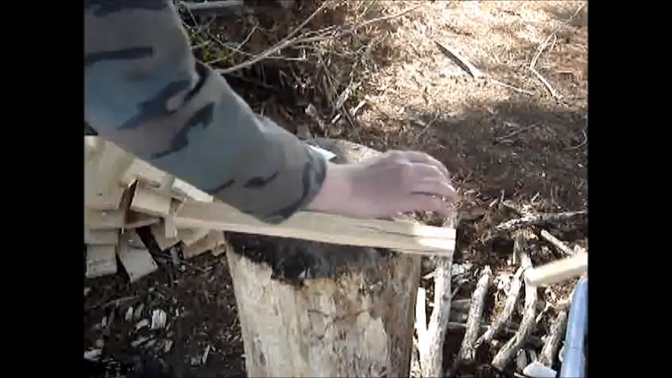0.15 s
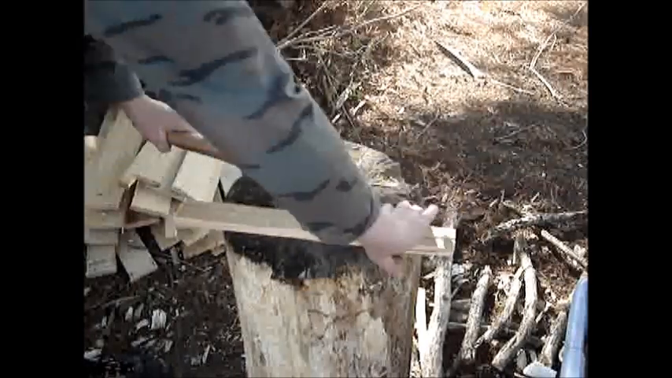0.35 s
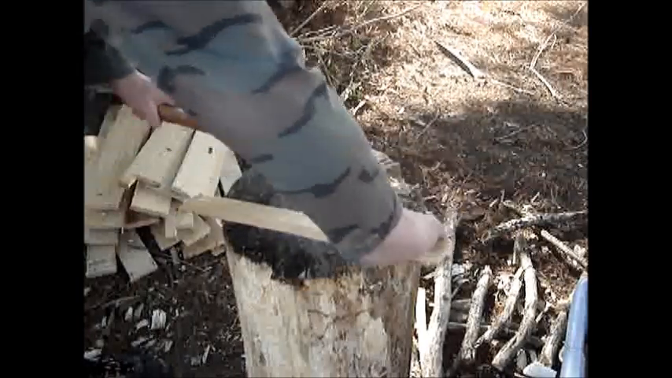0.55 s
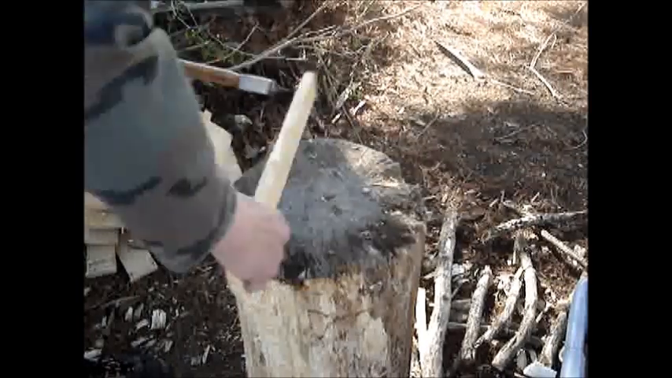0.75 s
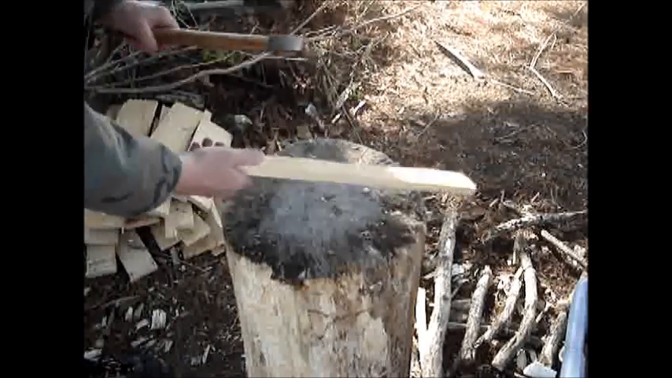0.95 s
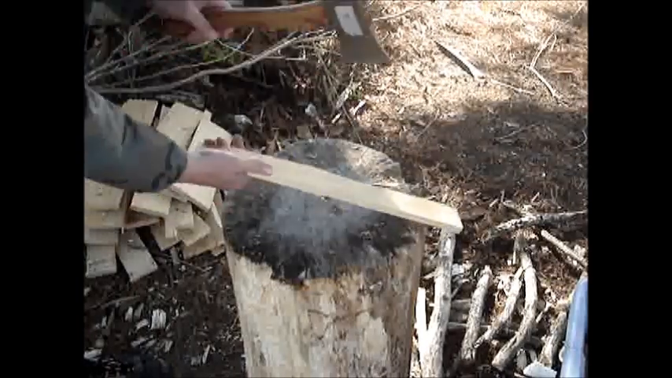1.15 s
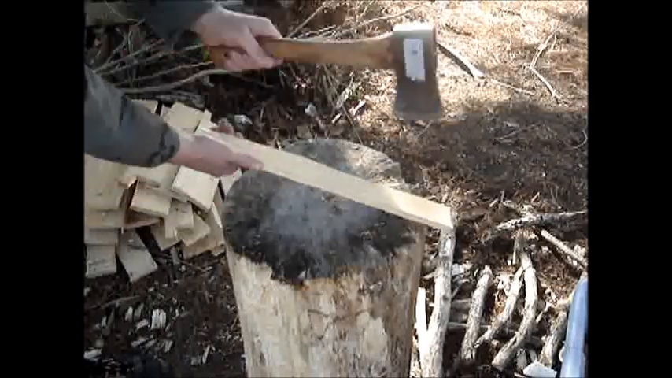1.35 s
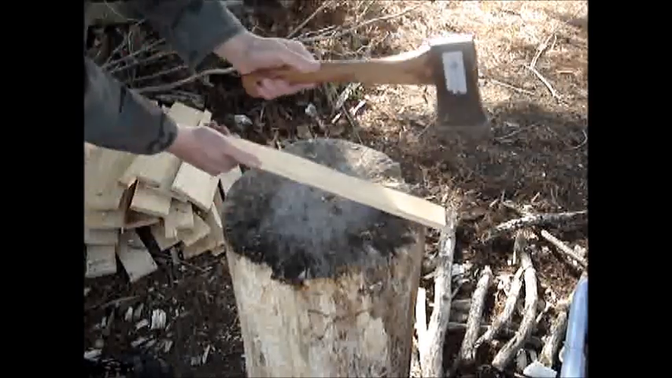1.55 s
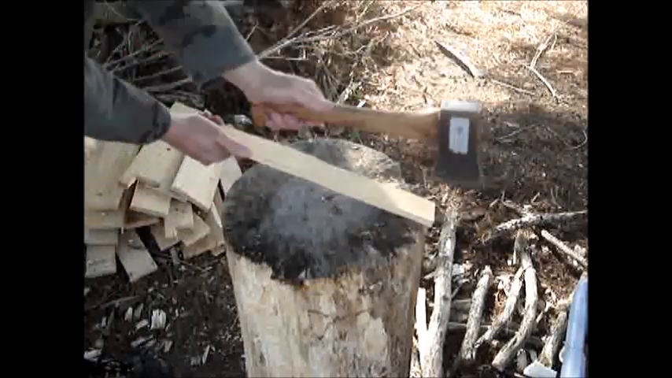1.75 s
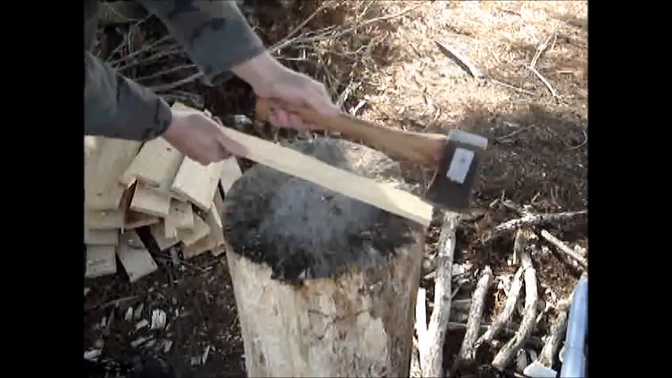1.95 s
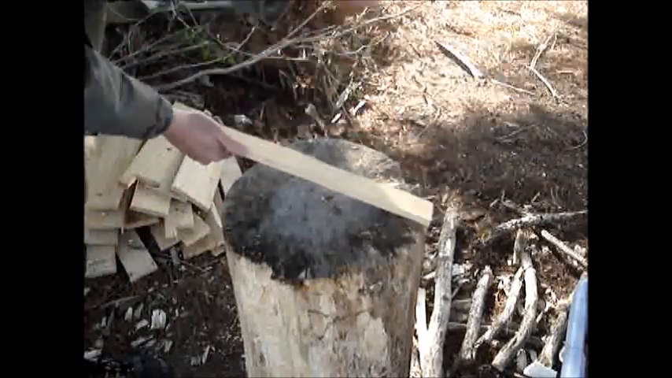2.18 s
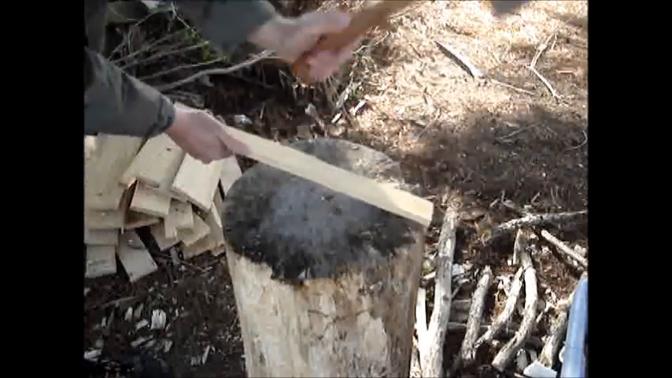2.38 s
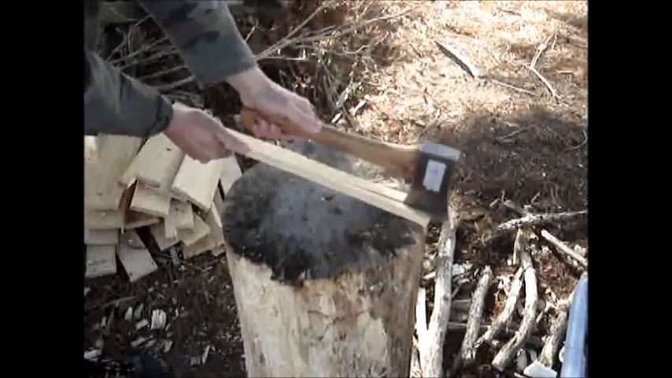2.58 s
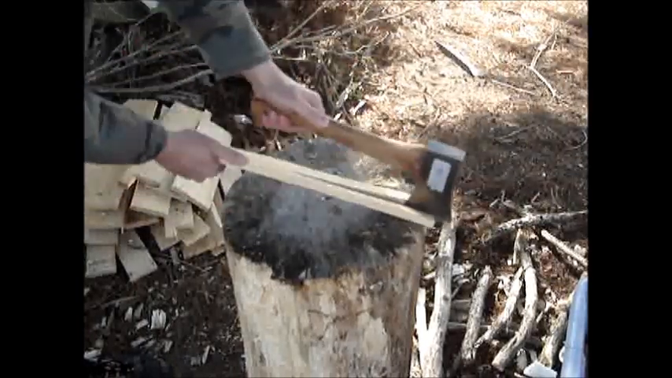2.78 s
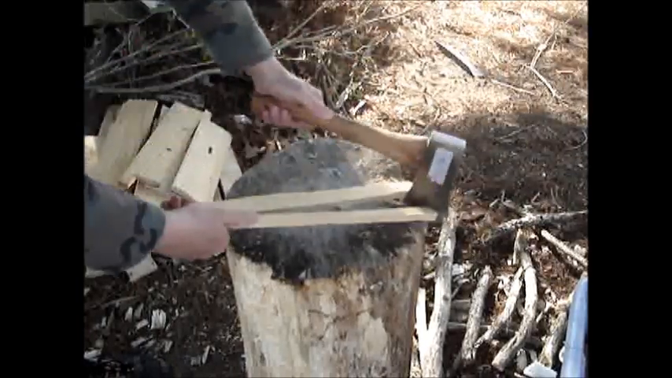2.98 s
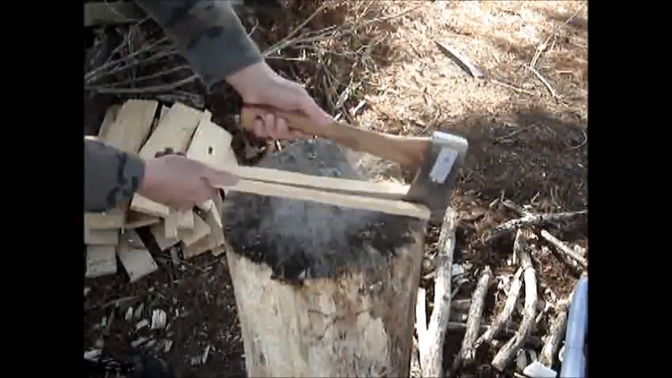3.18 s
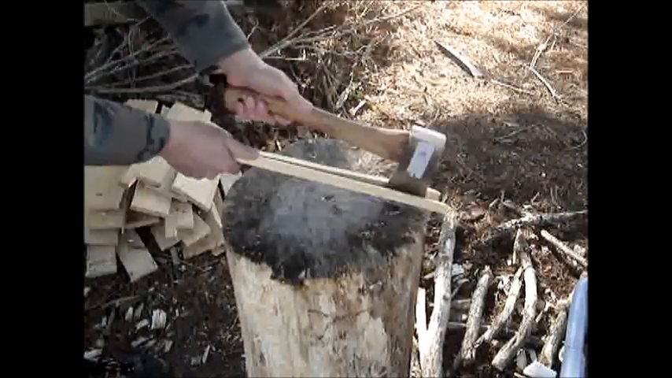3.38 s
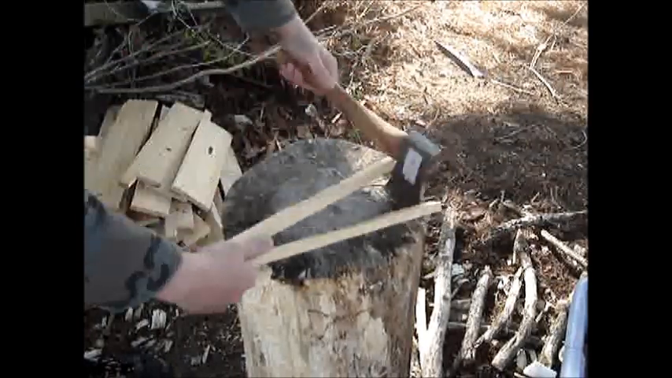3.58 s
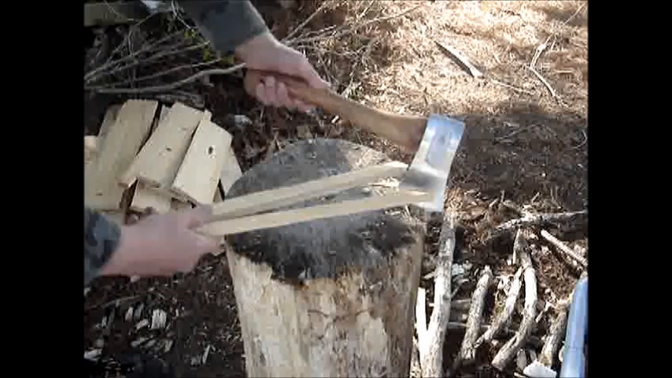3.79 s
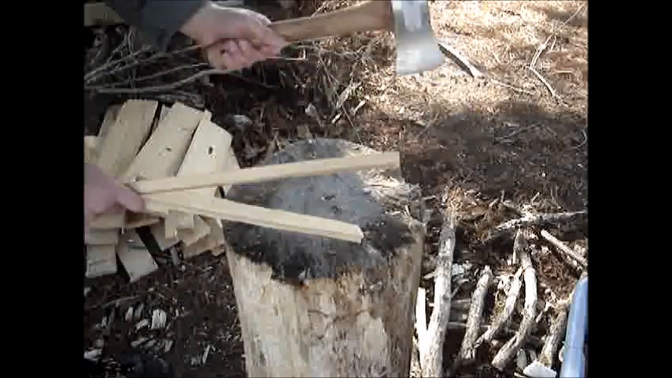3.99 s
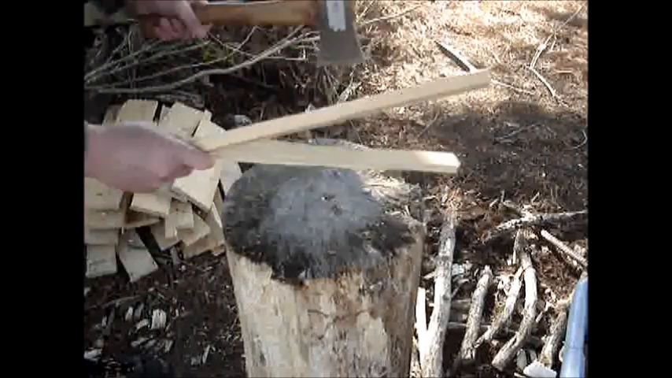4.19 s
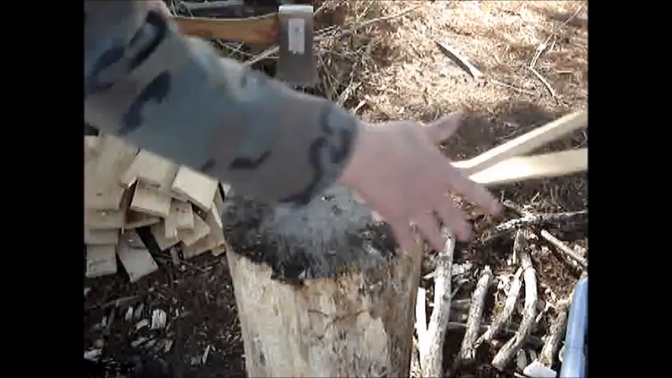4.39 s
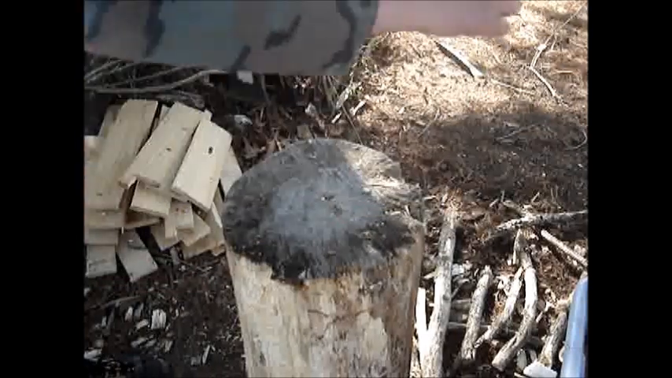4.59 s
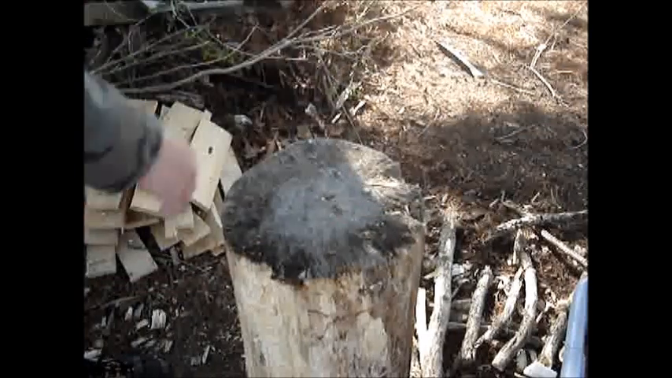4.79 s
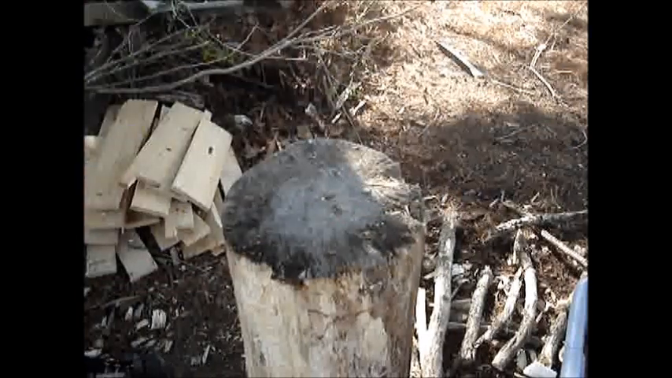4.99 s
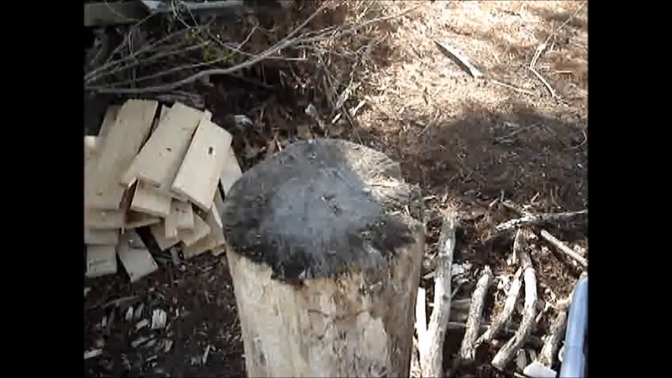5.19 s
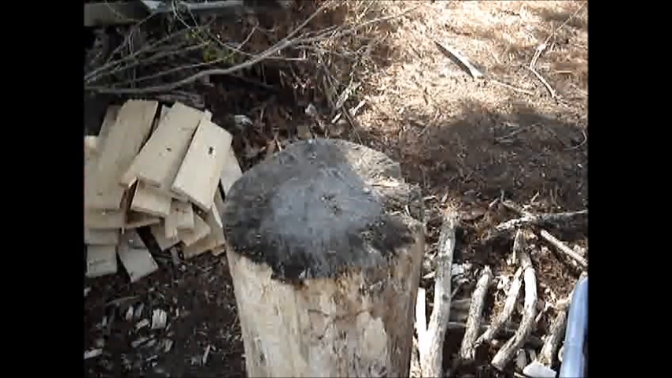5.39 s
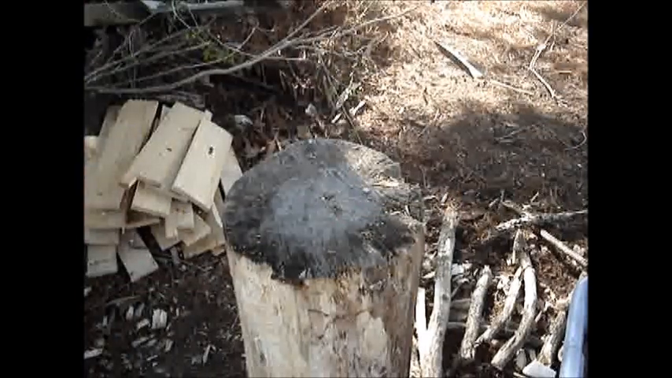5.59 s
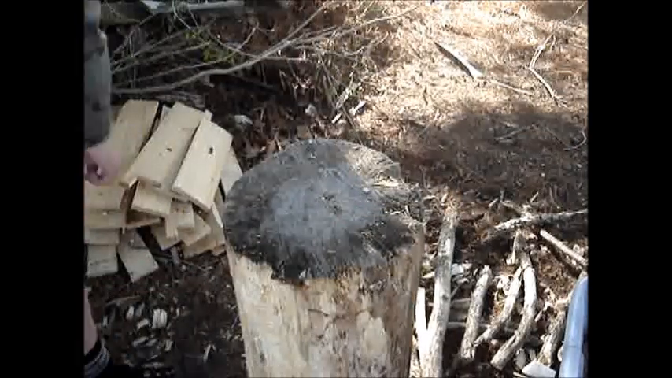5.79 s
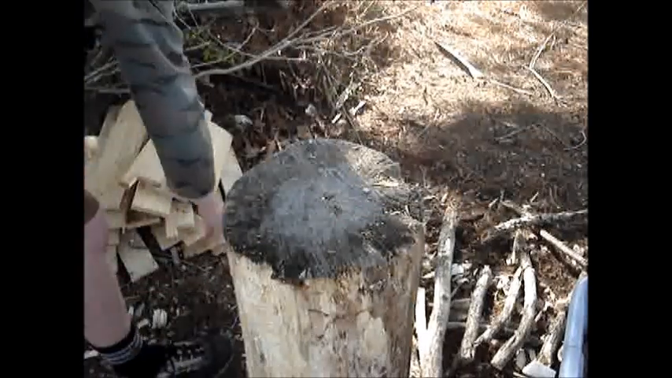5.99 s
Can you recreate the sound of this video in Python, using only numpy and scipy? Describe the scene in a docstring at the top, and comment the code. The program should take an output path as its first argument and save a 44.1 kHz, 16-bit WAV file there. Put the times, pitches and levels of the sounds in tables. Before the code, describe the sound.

Dry kindling is split at close range: a tossed stick rattles, short dull knocks, a crackling split, two halves clatter, with airy rush and faint birdsong.

```python
"""Kindling is split with a hatchet on a stump at the edge of a wood, over a distant rush of air.
Small birds whistle and far engines drone; a stick is tossed on the pile: noise bursts and ringing modes.
A dry board is laid down, struck twice (short dull knocks) and twisted until its fibres snap (bright cracks).
The halves are tossed too, and the birds whistle and chip (sliding tones).
All through, the air is filtered noise and the recorder adds a thin whine."""
import sys
import numpy as np
from scipy import signal
from scipy.fft import rfft, irfft
from scipy.io import wavfile

SR = 44100
rng = np.random.default_rng(int(sys.argv[2]) if len(sys.argv) > 2 else 0)


def store_pcm(level_fs):
    """Save levels as 16-bit WAV."""
    pcm = np.round(np.clip(level_fs, -1, 1) * 32767).astype(np.int16)
    wavfile.write(sys.argv[1], SR, np.atleast_2d(pcm).T)


N = 266800
TIME = np.arange(N) / SR

# bending modes of the two sticks: f/Hz, level/dB, t60/s (time to fall by 60 dB)
FIRST_STICK = [(668, -10, .15), (1034, -7, .22), (1231, -14, .12), (1975, 0, .105), (2478, -15, .08),
               (3035, -3, .1), (3261, -17, .11), (4378, -22, .13)]
SECOND_STICK = [(954, -13, .2), (1410, -15, .09), (1831, 0, .11), (2955, -11, .1)]
# colour of a touch on the woodpile: f/Hz, level/dB per Hz
PILE_COLOUR = [(71, -102), (120, -28.5), (612, 2), (838, -0.5), (989, 4.5), (1630, 0.5), (1930, 2.5),
               (2540, 2), (2790, -4), (3120, -1.5), (4510, -8.5), (5140, -16.5), (10000, -32.5),
               (13000, -68), (22000, -120)]
# colour of breaking fibres: f/Hz, level/dB per Hz
SNAP_COLOUR = [(59, -39), (100, -17), (312, -23), (624, -18), (1200, -15), (1540, -7), (1670, -11),
               (2060, -3), (3270, 0.5), (3670, 2), (7070, -7.5), (10000, -22.5), (13000, -73),
               (22000, -120)]


def chops():
    """Held down on the stump, the board gives a dead, short knock and settles; the blow that bites cracks it."""
    # board and blade knock on the stump: t/s, level/dB, t60/s, brightness/dB per octave, bass/dB,
    # board mode f/Hz, its ring/dB, settling/dB against the knock
    blows = [(1.0806, -14, .025, 5.5, 22.5, 3420, -3, -21), (1.8756, -10.3, .028, -1.5, 0, 827, -4.5, -21),
             (2.5311, -11.5, .03, 3.5, 13, 2170, 3, -22), (3.539, -31, .046, -1.5, -10, 760, -4, -14),
             (3.9754, -24.5, .05, -3, -6, 925, -9, -14)]
    settle_delay_s, settle_t60_s, settle_hz = .014, .11, 1950  # the board drops back after each knock
    bite_s, bite_db, bite_hz = 2.5482, -14, 1332
    give_s, give_db = .0047, -6  # the wood yields a little just before it cracks
    out = np.zeros(N)
    for s, db, t60, tilt_db, bass_db, mode_hz, ring_db, settle_db in blows:
        blow = knock(t60, .0069, tilt_db, bass_db, mode_hz, ring_db)
        add(out, s, from_db(db) * blow)
        settle = knock(settle_t60_s, crack_t60=.01, tilt_db=-4.5, bass_db=bass_db - 5,
                       mode_hz=settle_hz, ring_db=-10)
        add(out, s + settle_delay_s, from_db(db + settle_db) * settle)
    # a dying run of cracks as the wedge sinks in
    first_give = (bite_s - give_s, bite_db + give_db)
    cracks = dying_run(bite_s, bite_db, gap_s=.014, loss_db=9, count=4)
    for s, db in [first_give, *cracks]:
        mode_hz = bite_hz * rng.uniform(.92, 1.08)
        crack = knock(.11, crack_t60=.008, tilt_db=.5, bass_db=-13, mode_hz=mode_hz, ring_db=-3.5)
        add(out, s, from_db(db) * crack)
    return outdoors(out, wet_db=-18.5, t60=.18, damping=.25, delay_s=.008)


def knock(t60, crack_t60, tilt_db, bass_db, mode_hz, ring_db):
    """One blow on the held board: a noise burst plus the ring of its main mode."""
    # colour of a blow on the board: f/Hz, level/dB per Hz
    chop_colour = [(47, -34.5), (80, -18), (147, -26.5), (437, -14), (941, -4.5), (1200, -2.5),
                   (1560, -4.5), (1910, 0.5), (2240, -1.5), (2640, -2), (3100, -6), (4830, -15),
                   (8010, -26), (10000, -36.5), (13000, -81), (22000, -120)]
    blow = contact(chop_colour, t60, damping=.12, crack=.69, crack_t60=crack_t60, rise_s=.00026,
                   tilt_db=tilt_db, bass_db=bass_db)
    return blow + stick_ring([(mode_hz, ring_db, 1.03 * t60)])


def splitting():
    """The split runs along the grain in bright snaps, over a creeping crackle of tiny fibres."""
    # thick fibres snap as the blade is twisted and the halves are parted:
    # t/s, level/dB, brightness/dB per octave, bass/dB
    thick_fibres = [(2.812, -22.5, 2, 6), (2.83, -21, 2.5, 7), (2.842, -20.5, -.5, 8),
                    (2.862, -18.5, 4.5, 0), (2.868, -17.5, 3, -9), (2.875, -25, 1.5, 7),
                    (2.8861, -19.5, 4, 9), (2.9094, -20.5, 5, -4), (2.9199, -19, 5, -7),
                    (2.9403, -24.5, 4.5, -4), (2.9739, -19.5, 1.5, 14), (3.3235, -35.5, 3, 0),
                    (3.5261, -20, -1, 2), (3.5438, -29.5, 2, 4), (3.5768, -30.5, 13.5, 3),
                    (3.5992, -32, -2, -2), (3.894, -39, 3, -10), (3.9464, -39, 0, -4)]
    neighbour_s, neighbour_db = .004, -11.5  # a neighbouring fibre gives way just after each snap
    out = tearing()
    for s, db, tilt_db, bass_db in thick_fibres:
        add(out, s, from_db(db) * snap(tilt_db, bass_db))
        later_s = s + neighbour_s * rng.uniform(.42, 1.5)
        add(out, later_s, from_db(db + neighbour_db) * snap(tilt_db, bass_db=0))
    return outdoors(out, wet_db=-40, t60=.16, damping=.16, delay_s=.0065)


def snap(tilt_db, bass_db):
    """One thick fibre breaks; the whole board jerks in the hand as a low 55 Hz thump."""
    crack = contact(SNAP_COLOUR, .017, damping=.067, crack=1.04, crack_t60=.0067, rise_s=.0012,
                    tilt_db=tilt_db, bass_db=bass_db)
    return crack - stick_ring([(55, -30.5 + bass_db, .045)])


def tearing():
    """Many tiny fibres part at random while the split creeps on."""
    # the split creeps on between snaps: start t/s, length/s, level/dB
    creeps = [(2.794, 0.16, -38.5), (2.929, .13, -47.5), (3.295, 0.14, -52.5), (3.514, 0.13, -46.5),
              (3.621, 0.33, -55.5), (4.36, .04, -52)]
    out = np.zeros(N)
    for s, length, db in creeps:
        fibres = crackle(length, per_s=2000, spread_db=4.5, colour=SNAP_COLOUR, tilt_db=-7, bass_db=-17.5)
        add(out, s, from_db(db) * fibres)
    return out


def tossed_sticks():
    """Each stick lands on its tip, slaps down flat, rings, rattles and stirs the litter; rebounds follow."""
    # a tossed stick meets the pile tip first, then falls flat: t/s, tip level/dB, fall time/s,
    # slap level/dB, ring level/dB, rattle level/dB, brightness/dB per octave, its modes
    tosses = [(0.3872, -12.5, 0.025, -10.5, -3, -17, -.8, FIRST_STICK),
              (4.6719, -12, 0.028, -11.5, -11, -14.5, .5, FIRST_STICK),
              (4.7172, -15, .0055, -19.5, -3, -23.5, 1, SECOND_STICK)]
    # loose wood rebounds on the pile; the spot that is struck favours one mode:
    # t/s, level/dB, brightness/dB per octave, mode f/Hz, its ring/dB
    bounces = [(.512, -33, -12.5, 770, -12), (.559, -20.5, 1.5, 3090, -4), (0.604, -24.5, -2.5, 2500, -11),
               (.638, -27.5, -2.5, 1030, -4), (.844, -34, -5, 1040, -3), (4.8683, -23.5, -1.5, 1830, -16),
               (4.931, -26.5, -1, 955, -15), (4.944, -25.5, -3, 1420, -14), (4.971, -18, 1, 2345, -12),
               (5.1213, -27.5, -1, 4820, -13), (5.306, -37.5, -1.5, 1630, -9)]
    tip_ring_db = -6.5  # against the tip's blow
    skid_s, skid_db = .0105, -10.5  # the tip skids once; dB against the tip's blow
    rattle_delay_s = .009  # after the slap
    out = np.zeros(N)
    for s, tip_db, fall_s, slap_db, ring_db, rattle_db, tilt_db, modes in tosses:
        ring = stick_ring(modes)
        flat_s = s + fall_s
        tip = clack(.068, tilt_db) + from_db(tip_ring_db) * ring
        add(out, s, from_db(tip_db) * tip)
        add(out, s + skid_s, from_db(tip_db + skid_db) * clack(.055, tilt_db))
        # the flat slap is a little brighter than the tip
        slap = clack(.069, tilt_db + 1)
        add(out, flat_s, from_db(slap_db) * slap)
        add(out, flat_s, from_db(ring_db) * lifted(ring))
        add(out, flat_s + rattle_delay_s, rattle(ring, rattle_db, tilt_db))
        # chips and dry needles stir under it
        litter = crackle(.22, per_s=1500, spread_db=3, colour=PILE_COLOUR, tilt_db=-1.2, bass_db=9)
        add(out, flat_s, from_db(-50.5) * litter)
    for s, db, tilt_db, mode_hz, ring_db in bounces:
        add(out, s, from_db(db) * rebound(tilt_db, mode_hz, ring_db))
    return outdoors(out, wet_db=-24.5, t60=.67, damping=.25, delay_s=.012)


def clack(t60, tilt_db):
    """One touch of a stick on the pile: a short burst of noise in the pile's colour."""
    return contact(PILE_COLOUR, t60, damping=.44, crack=.98, crack_t60=.02, rise_s=.0006,
                   tilt_db=tilt_db, bass_db=2)


def lifted(ring):
    """The pile mutes a stick until it has sprung clear, so its ring swells in over some 7.5 ms."""
    return ring * (1 - np.exp(-(TIME[:len(ring)] / .0075) ** 2))


def rattle(ring, db, tilt_db, count=4, size=32768):
    """Ever weaker, duller and longer touches of a stick coming to rest."""
    out = np.zeros(size)
    touches = dying_run(0, db, gap_s=.012, loss_db=3, count=count)
    for k, (s, touch_db) in enumerate(touches):
        t60 = .06 + k * .022
        touch_tilt_db = tilt_db + 1.8 - k * 1.3
        touch = clack(t60, touch_tilt_db) + from_db(-20) * ring
        add(out, s, from_db(touch_db) * touch)
    return out


def rebound(tilt_db, mode_hz, ring_db):
    """A light, sharp touch with one clear mode over the faint ring of the whole first stick."""
    touch = contact(PILE_COLOUR, .078, damping=.41, crack=1.43, crack_t60=.015, rise_s=.0004,
                    tilt_db=tilt_db, bass_db=4)
    clear_mode = stick_ring([(mode_hz, ring_db, .1)])
    return touch + clear_mode + from_db(-16) * stick_ring(FIRST_STICK)


def birds(count=4):
    """Nearly pure sliding whistles and a series of buzzy high chips, smeared by the trees."""
    # whistled notes: start t/s, length/s, first f/Hz, last f/Hz, level/dB
    notes = [(-.01, 0.1305, 3520, 3360, -47.5), (.1, .18, 3400, 3364, -58.5),
             (5.298, 0.18, 2645, 2695, -48.5), (5.563, 0.217, 2623, 2715, -47),
             (5.827, .21, 2690, 2692, -41.5)]
    flutter_db, flutter_hz = 1.5, 8.3  # unsteady loudness of a whistle
    chip_start_s, chip_gap_s, chip_s = 5.211, .265, .068
    chip_hz, chip_climb_hz, chip_buzz_hz = 6640, 208, 150
    chip_db, chip_growth_db = -56.5, 2.5
    out = np.zeros(N)
    for s, length, first_hz, last_hz, db in notes:
        note = glide(length, first_hz, last_hz, waver_hz=16, waver_rate_hz=44)
        flutter = flutter_db * narrow_noise(flutter_hz, flutter_hz, len(note))
        add(out, s, from_db(db + flutter) * note)
    # a second bird chips in even time, each chip louder and sweeping higher than the last
    for k in range(count):
        chip = glide(chip_s, chip_hz, chip_hz + k * chip_climb_hz, chip_buzz_hz, waver_rate_hz=79)
        add(out, chip_start_s + k * chip_gap_s, from_db(chip_db + k * chip_growth_db) * chip)
    return outdoors(out, wet_db=-8, t60=.6, damping=.2, delay_s=.02)


def far_engines():
    """Faint low drones of engines come and go as slowly sliding tones."""
    # engines on a far road: start t/s, length/s, first f/Hz, last f/Hz, level/dB
    drones = [(-0.05, 2.6, 99, 85, -62), (1.7, 0.65, 110, 133, -55.5), (1.6, 0.95, 218, 235, -55.5)]
    out = np.zeros(N)
    for s, length, first_hz, last_hz, db in drones:
        drone = glide(length, first_hz, last_hz, waver_hz=1.45, waver_rate_hz=5.8)
        add(out, s, from_db(db) * drone)
    return out


def distant_air():
    """Noise in three bands: rumble and rush swell and ebb slowly under a steady hiss."""
    # distant air: t/s, rush level/dB, rumble level/dB
    swells = [(0, -46, -53), (.5, -44.5, -54.5), (.85, -47.5, -56), (1.35, -43.5, -54.5), (1.9, -44.5, -50),
              (2.42, -43.5, -50.5), (3.0, -52.5, -64.5), (4.13, -50, -60), (4.55, -47.5, -55),
              (5.05, -44, -57.5), (6.05, -45, -50.5)]
    # colour of the air: f/Hz, level/dB per Hz
    air_colour = [(15, -46), (25, -10.5), (37, -13.5), (107, -2.5), (227, -1.5), (394, -1.5), (470, -0.5),
                  (519, 0), (1050, 3), (2860, -15.5), (3400, -17.5), (4600, -20), (7220, -22.5),
                  (7980, -19.5), (10000, -30.5), (13000, -80), (22000, -120)]
    hz = bins(N)
    noise = rfft(rng.standard_normal(N)) * from_db(at_hz(air_colour, hz))
    s, rush_db, rumble_db = np.transpose(swells)
    levels = [np.interp(TIME, s, rumble_db), np.interp(TIME, s, rush_db), -56]
    edges_hz = [0, 350, 2500, SR / 2]
    out = np.zeros(N)
    for low, high, db in zip(edges_hz, edges_hz[1:], levels):
        band = irfft(noise * (hz > low) * (hz <= high), N)
        out += rms_one(band) * from_db(db)
    return out


def recorder_whine():
    """A thin electronic tone that restarts each frame and blinks off twice a frame."""
    whine_hz, frame_hz, whine_db = 7867, 29.97, -61  # level while the tone is on
    in_frame = TIME * frame_hz % 1
    lit = 2 * in_frame % 1 > .06
    tone = np.sqrt(2) * np.sin(2 * np.pi * whine_hz * in_frame / frame_hz)
    return from_db(whine_db) * lit * tone


def contact(colour, t60, damping, crack, crack_t60, rise_s, tilt_db, bass_db, size=16384):
    """A hard crack and the short ring of dry wood; rms 1 over its first 4 ms."""
    t = np.arange(size) / SR
    hard_crack = crack * rng.standard_normal(size) * fade(t, crack_t60)
    burst = dying_noise(t60, damping) + hard_crack
    onset = 1 - np.exp(-(t / rise_s) ** 2)
    sound = body(burst * onset, colour, tilt_db, bass_db)
    return sound / np.sqrt(np.mean(sound[:SR // 250] ** 2))


def dying_noise(t60, damping, size=16384):
    """Noise like countless overlapping modes: t60 holds at 2 kHz, higher octaves die sooner."""
    t = np.arange(size) / SR
    white = rfft(rng.standard_normal(size))
    octave = np.clip(np.log2(bins(size) / 2000), -3, 2)
    out = np.zeros(size)
    for k in range(-3, 3):
        band = irfft(white * np.maximum(1 - np.abs(octave - k), 0), size)
        life = 2 ** (-damping * k)
        out += band * fade(t, t60 * life) / np.sqrt(life)
    return out


def body(x, colour, tilt_db, bass_db):
    """Causal filter that gives a burst the colour of the wood, tilted by the hardness of the contact."""
    size, spectrum = len(x), rfft(x)
    hz = bins(size)
    tilt = tilt_db * np.log2(np.clip(hz, 500, 10000) / 2000)
    bass = bass_db / (1 + (hz / 700) ** 2)
    shape_db = at_hz(colour, hz) + tilt + bass
    # folding the cepstrum makes the filter answer only after the blow, never before
    cepstrum = irfft(np.log(from_db(shape_db)))
    cepstrum[1:size // 2] *= 2
    cepstrum[size // 2 + 1:] = 0
    return irfft(spectrum * np.exp(rfft(cepstrum)))


def stick_ring(modes, size=16384):
    """A free stick rings in its bending modes, each a fading sine."""
    t = np.arange(size) / SR
    return sum(from_db(db) * np.sin(2 * np.pi * hz * t) * fade(t, t60) for hz, db, t60 in modes)


def crackle(length, per_s, spread_db, colour, tilt_db, bass_db, size=16384):
    """A swell of tiny random clicks, a few much louder than the rest; rms 1."""
    span = min(int(length * SR), size)
    parting = rng.random(span) < per_s / SR
    loudness = from_db(spread_db * np.minimum(rng.exponential(1, span), 4))
    strength = loudness * rng.choice([-1, 1], span)
    grains = parting * strength * signal.windows.tukey(span, .5)
    grains = np.pad(grains, (0, size - span))
    return rms_one(body(grains, colour, tilt_db, bass_db)[:span])


def dying_run(s, db, gap_s, loss_db, count):
    """Contacts at uneven gaps, each weaker than the last: rows of t/s, level/dB."""
    gaps = gap_s * rng.uniform(.75, 1.25, count)
    return zip(s + np.cumsum(gaps) - gaps[0], db - loss_db * np.arange(count))


def glide(length, first_hz, last_hz, waver_hz, waver_rate_hz):
    """A tone that swells, slides and fades, with a restless pitch; rms 1 at its height."""
    size = int(length * SR)
    waver = waver_hz * narrow_noise(waver_rate_hz, 2 * waver_rate_hz, size)
    pitch = np.linspace(first_hz, last_hz, size) + waver
    swell = signal.windows.tukey(size, .5)
    return np.sqrt(2) * swell * np.sin(2 * np.pi * np.cumsum(pitch) / SR)


def narrow_noise(hz, width_hz, size):
    """Noise in one resonance, rms 1."""
    resonance = 1 / (1 + (2 * (bins(size) - hz) / width_hz) ** 2)
    return rms_one(irfft(rfft(rng.standard_normal(size)) * resonance, size))


def outdoors(x, wet_db, t60, damping, delay_s):
    """Ground, woodpile and trunks scatter a faint tail back."""
    tail = dying_noise(t60, damping, size=32768)
    scattered = signal.fftconvolve(x, tail / np.linalg.norm(tail))[:N]
    out = x.copy()
    add(out, delay_s, from_db(wet_db) * scattered)
    return out


def from_db(db):
    """Decibels to gain."""
    return 10 ** (np.asarray(db) / 20)


def rms_one(x):
    """Scale to unit rms (average strength)."""
    return x / np.sqrt(np.mean(x ** 2) + 1e-20)


def fade(t, t60):
    """Free decay: 60 dB down after t60 (at least 1 ms)."""
    return np.exp(-np.log(1000) * t / max(t60, 1e-3))


def add(out, s, sound):
    """Mix a sound in at time s, cutting off what falls outside the scene."""
    start = int(round(s * SR))
    sound, start = sound[max(-start, 0):], max(start, 0)
    out[start:start + len(sound)] += sound[:max(N - start, 0)]


def at_hz(points, hz):
    """Read a spectrum table on a log-frequency axis."""
    points = np.array(points)
    return np.interp(np.log(hz), np.log(points[:, 0]), points[:, 1])


def bins(size):
    """Frequencies of a real FFT, kept above zero."""
    return np.maximum(np.fft.rfftfreq(size, 1 / SR), 1)


def scene():
    """Woodwork close by; birds, engines and air far off."""
    woodwork = chops() + splitting() + tossed_sticks()
    far_off = birds() + far_engines() + distant_air()
    return (woodwork + far_off)[None, :]


def record(dry):
    """The recorder whines faintly, rounds loud peaks and cuts the top."""
    x = dry + recorder_whine()
    ceiling = np.where(x > 0, .75, 1.0)  # upward peaks are rounded sooner
    x = x / (1 + (x / ceiling) ** 4) ** (1 / 4)
    # loud blows shift the microphone's bias: a soft sub-bass bump follows each one
    bump = signal.sosfilt(signal.butter(1, 25, fs=SR, output="sos"), x ** 2)
    x = x + .32 * bump
    x = signal.sosfilt(signal.butter(1, 8, "high", fs=SR, output="sos"), x)
    return signal.sosfilt(signal.ellip(10, .2, 70, 10100, fs=SR, output="sos"), x)


dry = scene()
out = record(dry)
store_pcm(out)
```